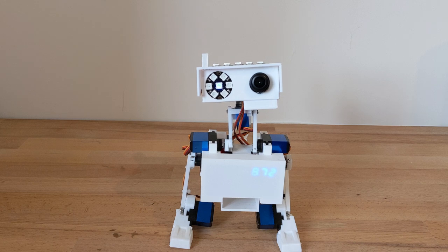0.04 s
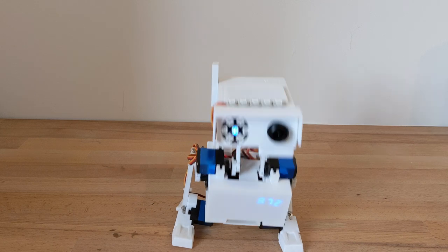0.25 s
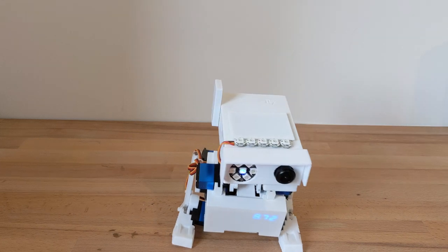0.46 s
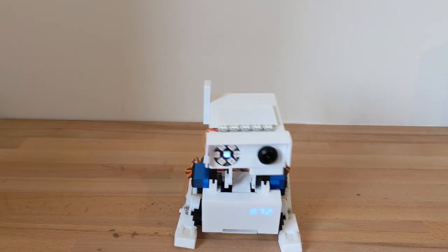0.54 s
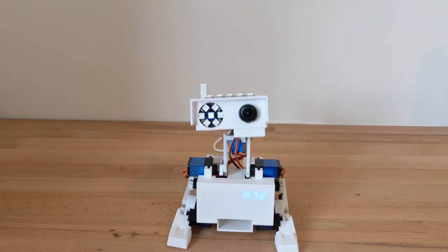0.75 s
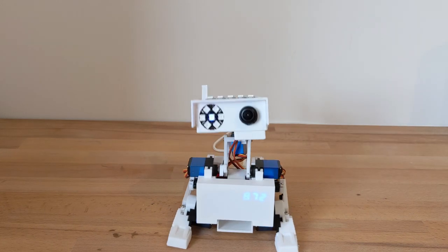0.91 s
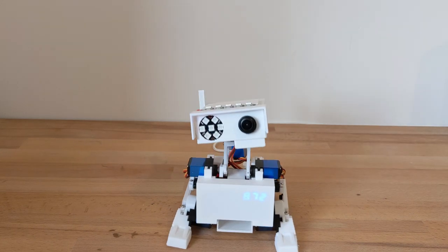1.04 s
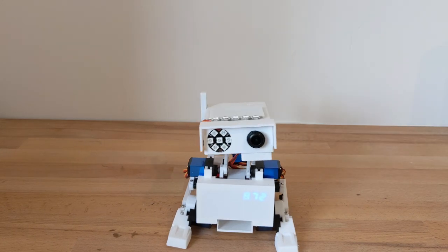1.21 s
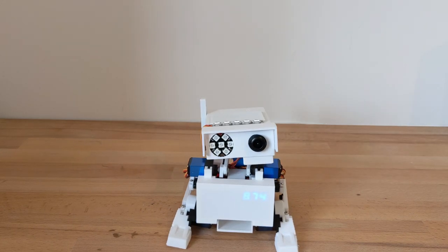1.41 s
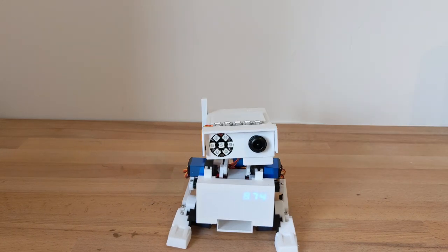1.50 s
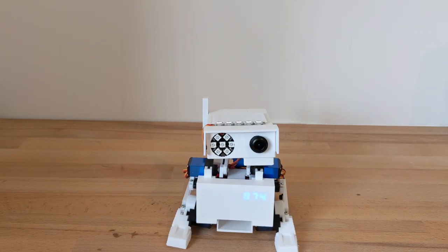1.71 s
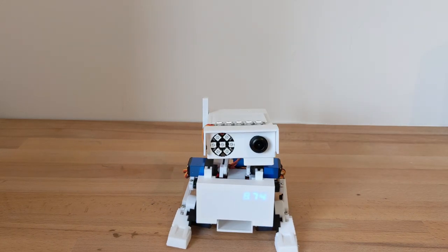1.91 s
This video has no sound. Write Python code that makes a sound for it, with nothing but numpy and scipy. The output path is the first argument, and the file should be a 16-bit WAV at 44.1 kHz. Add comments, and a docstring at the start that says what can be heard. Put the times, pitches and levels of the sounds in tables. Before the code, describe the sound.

Servo whirring from a small plastic robot, gritty and high, with faint knocks on a wooden tabletop

```python
"""A quiet room's rumble, microphone hiss and a thin electrical whistle come first, as shaped noise.
Small servos in a legged desk robot then whir in short surges: random tooth ticks ring plastic cases.
Its parts knock on a wooden table top, which booms and hums as sums of decaying modes; soft thuds swell.
Late in the scene short motor whines, noise in moving narrow resonances, rise out of the gear noise."""
import sys
import numpy as np
from scipy import signal
from scipy.fft import rfft, irfft
from scipy.io import wavfile
from scipy.ndimage import uniform_filter1d

SR = 44100
rng = np.random.default_rng(int(sys.argv[2]) if len(sys.argv) > 2 else 0)


def log_audio(samples):
    """Write samples as a 16-bit WAV file to the path given in sys.argv[1]."""
    # one column per channel
    frames = np.atleast_2d(samples).T
    # limit to full scale, then quantise
    limited = np.clip(frames, -1, 1)
    pcm = np.round(limited * 32767).astype(np.int16)
    wavfile.write(sys.argv[1], SR, pcm)


N = 85995  # length in samples

# Spectrum of rumble and hiss. Each row: frequency in Hz, relative density in dB per Hz.
FLOOR_SPECTRUM = [(24, -42), (40, 10), (263, -2), (466, -10.5), (1110, -11.5), (2340, -18), (5040, -26),
                  (11100, -34), (13300, -40)]
# Stereo balance of the noise floor. Each row: frequency in Hz, left over right in dB.
FLOOR_BALANCE = [(60, 5.5), (1000, -1), (11500, 23.5), (13000, 10)]
# Likeness of the floor in the two channels. Each row: frequency in Hz, correlation from 0 to 1.
FLOOR_LIKENESS = [(50, 0.87), (250, 0.65), (1000, 0.067)]
FLOOR_DB = -63.5
WHISTLE_HZ, WHISTLE_WIDTH_HZ, WHISTLE_DB = 15650, 69, -81

# Effort of the servos, surging with each small step. Each row: time in seconds, level in dB.
SERVO_EFFORT = [(.122, -78.5), (.138, -58.5), (.19, -53.5), (.218, -63), (.236, -44), (.256, -48),
                (.282, -38), (.316, -47.5), (.342, -36), (.366, -43.5), (.394, -37), (.415, -42),
                (.48, -37.5), (.518, -42.5), (.54, -34), (.564, -42.5), (.59, -36), (.618, -40), (.68, -40),
                (.695, -34), (.722, -41), (.738, -32), (.78, -45.5), (.862, -49.5), (.941, -70.5),
                (.947, -44), (1.01, -38.5), (1.042, -48.5), (1.048, -37), (1.096, -36), (1.146, -42),
                (1.212, -34), (1.252, -51.5), (1.272, -45), (1.291, -63), (1.293, -44), (1.298, -51.5),
                (1.322, -36), (1.372, -41), (1.414, -56.5), (1.46, -52), (1.496, -63.5), (1.514, -50),
                (1.56, -44), (1.616, -43), (1.67, -64.5), (1.75, -74)]
# Colour of the gears. Each row: time in seconds, centre of the main case resonances in Hz,
# upper resonance in dB, gear grind in dB (the last two before UPPER_DB and GRIND_DB are added).
GEAR_COLOUR = [(.12, 6600, 4, -4), (.28, 6350, -6, -9.5), (.58, 6260, -2, -6), (.68, 6230, -12, -9),
               (.78, 6350, -10, -5), (.92, 6400, -7, -6.5), (.95, 7660, -12, -16.5), (1.1, 7880, -5, -20),
               (1.22, 7420, -5.5, -14), (1.29, 7100, -7, -13.5), (1.34, 7900, -6, -17.5),
               (1.47, 6400, 4, 2.5), (1.55, 6680, -6, -3.5), (1.62, 5780, -34, -13)]
# Spectrum of the gear grind. Each row: frequency in Hz, relative gain in dB.
GRIND_SPECTRUM = [(300, -27.5), (700, -5), (1500, -13), (2500, -0.5), (4000, 3.5), (5500, 13.5), (10000, 7),
                  (15500, 0.5)]
TEETH_PER_S, TOOTH_SPREAD_DB = 3500, 11  # mean tick rate; mean excess of the random tick size
HISS_SHARE = 0.67  # friction hiss against ticks, 0 to 1
SERVOS, CASE_RING_S = 6, 0.026  # number of servos; t60 of each case's fine ring
TURN_HZ, TURN_DB = 10, 4.5  # how fast and far the servos trade places in loudness
CASE_WIDTH_HZ, CASE_SPLIT, CASE_DB = 1180, 0.17, -3  # split: greatest half spacing, share of the centre
UPPER_HZ, UPPER_WIDTH_HZ, UPPER_DB = 12600, 4220, -1
DRIFT, DRIFT_HZ = 0.054, 32  # the case resonances wander as the joints turn: rms share, top rate
GRIND_DB = 8
GEAR_BALANCE_DB = 1.14  # left over right

# Knocks on the table. Each row: start in seconds, clack in dB before CLACK_DB is added, boom in dB
# before BOOM_DB is added, hardness (bandwidth of the blow) in Hz, table overtones relative in dB.
TABLE_KNOCKS = [(.365, -23.5, -47.5, 4080, 5.5), (0.456, -69, -50.5, 600, -2), (.551, -36, -46, 1250, 9),
                (.612, -57.5, -59.5, 510, 15.5), (0.689, -40, -56.5, 1430, 12.5),
                (0.792, -46.5, -45.5, 1090, -0.5), (0.963, -40.5, -46.5, 2470, -21),
                (.987, -43.5, -54.5, 890, 3), (1.156, -53.5, -56, 505, -14), (1.254, -55, -48.5, 507, -35),
                (1.473, -58, -54, 515, -23)]
# Deep modes of the table top. Each row: frequency in Hz, relative level in dB, t60 in seconds.
TABLE_MODES = [(66, -17, 0.44), (130.7, 1.1, 0.41)]
# Overtones of the table top. Each row: frequency in Hz, relative level in dB, t60 in seconds.
TABLE_OVERTONES = [(186.4, -13.5, 0.25), (253.5, -5.5, 0.12), (334.3, -10.5, 0.085), (444, -13, 0.11)]
# Modes of the plastic shell. Each row: frequency in Hz, relative level in dB, t60 in seconds.
SHELL_MODES = [(432, -13.5, 0.026), (676, -11, 0.035), (1225, 4, 0.0063), (1550, -18, 0.0013),
               (2210, 6.5, 0.0063), (3280, 12, 0.0017)]
BOOM_DB, CLACK_DB = 3.5, -10
BOOM_RISE_S, BOOM_HOLD_S, BOOM_STOP_S = 0.0084, 0.067, 0.016  # the robot's weight damps the table again
BOOM_TAIL_DB = -13.5  # what still rings after that
HUM_DB = -21  # table hum relative to servo effort
BLOW_DB, REBOUND_S = -17, 0.001278  # direct blow beside the shell modes; delay of the second blow
RATTLE_DB, RATTLE_S = -25, 0.12  # starting level and t60 of the loose parts

# Soft low thuds. Each row: start in seconds, length in seconds, level in dB, frequency in Hz.
LOW_THUDS = [(0.573, 0.17, -52.5, 60.3), (0.8, 0.048, -51, 58.7), (1.777, 0.07, -48.5, 66.4),
             (1.836, 0.048, -47.5, 68), (1.899, 0.072, -48.5, 62)]
# Motor whines. Each row: start in seconds, length in seconds, level in dB, top of the pitch arch
# in Hz before the wobble.
MOTOR_WHINES = [(1.05, 0.096, -57.5, 1620), (1.19, 0.03, -57, 1120), (1.265, 0.03, -56.5, 810),
                (1.31, 0.08, -60.5, 1640), (1.422, 0.055, -57.5, 840), (1.52, 0.045, -61, 1240)]
WHINE_WIDTH_HZ, WHINE_FLUTTER_DB, WHINE_WOBBLE = 150, 2.5, .025  # wobble: rms share of the pitch
WHINE_ARCH_PER_S = 3.3  # longer runs climb further

# Decay of the room. Each row: frequency in Hz, t60 in seconds.
ROOM_DECAY = [(200, 0.4), (1000, 0.62), (4000, 0.18), (12000, 0.14)]
ROOM_DB, ECHOES_DB = -6.5, -10  # late tail, early echoes
EDGE_HZ = 16000  # top of the band


def amp(db):
    """Decibel law: a level in dB as an amplitude ratio."""
    return 10 ** (np.asarray(db) / 20)


def evened(x):
    """Power normalisation: scale to an rms of 1."""
    return x / np.sqrt(np.mean(x ** 2) + 1e-20)


def read(points, hz):
    """Interpolation of a spectrum along logarithmic frequency."""
    f, value = np.transpose(points)
    return np.interp(np.log(hz + 1), np.log(f + 1), value)


def curve(rows, column):
    """Linear interpolation of one column in time."""
    rows = np.array(rows)
    return np.interp(np.arange(N) / SR, rows[:, 0], rows[:, column])


def add(mix, start_s, sound):
    """Superposition: add a sound into the mix from its start time."""
    part = mix[round(start_s * SR):][:len(sound)]
    part += sound[:len(part)]


def slow(top_hz):
    """Low-pass noise: a random fluctuation slower than top_hz, with an rms of 1."""
    sos = signal.butter(2, top_hz, fs=SR, output="sos")
    return evened(signal.sosfiltfilt(sos, rng.standard_normal(N)))


def resonate(x, hz, width_hz):
    """Heterodyne resonance of peak gain 1: shift hz to zero, smooth, shift back; hz may move."""
    turn = np.exp(2j * np.pi * np.cumsum(hz * np.ones(len(x))) / SR)
    r = np.exp(-np.pi * width_hz / SR)
    return 2 * (turn * signal.lfilter([1 - r], [1, -r], x / turn)).real


def resonate_twice(x, hz, first_width_hz, second_width_hz):
    """Cascaded resonances: two passes at one frequency steepen the skirts."""
    return resonate(resonate(x, hz, first_width_hz), hz, second_width_hz)


def ring(modes):
    """Modal synthesis: a struck object is a sum of exponentially decaying sines."""
    t = np.arange(SR // 2) / SR
    return sum(amp(db - 60 * t / t60) * np.sin(2 * np.pi * hz * t) for hz, db, t60 in modes)


def floor():
    """Partly correlated noise: shared and separate parts give room rumble and hiss their width."""
    hz = np.fft.rfftfreq(N, 1 / SR)
    first, second = rfft(rng.standard_normal((2, N)), axis=1)
    same = read(FLOOR_LIKENESS, hz)
    half_balance = read(FLOOR_BALANCE, hz) / 2
    left = first * amp(half_balance)
    right = (same * first + np.sqrt(1 - same ** 2) * second) * amp(-half_balance)
    spectrum = np.array([left, right]) * amp(read(FLOOR_SPECTRUM, hz))
    return amp(FLOOR_DB) * evened(irfft(spectrum, N, axis=1))


def whistle():
    """Narrow-band noise: a sharp resonance makes a thin electrical whistle."""
    noise = rng.standard_normal(N)
    return amp(WHISTLE_DB) * evened(resonate_twice(noise, WHISTLE_HZ, WHISTLE_WIDTH_HZ, WHISTLE_WIDTH_HZ))


def teeth():
    """Random impulse train: uneven tooth ticks mixed with broadband friction hiss."""
    excess = np.minimum(rng.exponential(1, N), 5)
    size = amp(TOOTH_SPREAD_DB * excess) * rng.choice([-1., 1.], N)
    ticks = evened(size * (rng.random(N) < TEETH_PER_S / SR))
    return (1 - HISS_SHARE) * ticks + HISS_SHARE * rng.standard_normal(N)


def joints():
    """Convolution along separate paths: servos trade loudness, each with its own dense fine ring."""
    t = np.arange(SR // 10) / SR
    out = np.zeros((2, N))
    for _ in range(SERVOS):
        ticks = teeth() * amp(TURN_DB * slow(TURN_HZ))
        paths = rng.standard_normal((2, len(t))) * amp(-60 * t / CASE_RING_S)
        out += signal.fftconvolve(ticks[None], paths, axes=1)[:, :N]
    power = uniform_filter1d((out ** 2).mean(0), size=1300)
    return out / np.sqrt(power)  # level steady, so that the effort alone sets the surges


def gears(drives):
    """Source and filter: the tooth ticks excite case resonances and a broad gear grind."""
    low, high, top = (1 + DRIFT * slow(DRIFT_HZ) for _ in range(3))
    centre = curve(GEAR_COLOUR, 1)
    split = CASE_SPLIT * (centre.min() / centre) ** 2  # the pair closes up as it rises
    grind_gain = amp(read(GRIND_SPECTRUM, np.fft.rfftfreq(N, 1 / SR)))
    out = []
    for drive in drives:
        above = resonate_twice(drive, centre * (1 + split) * high, CASE_WIDTH_HZ, 2 * CASE_WIDTH_HZ)
        below = resonate_twice(drive, centre * (1 - split) * low, CASE_WIDTH_HZ, 2 * CASE_WIDTH_HZ)
        upper = resonate_twice(drive, UPPER_HZ * top, UPPER_WIDTH_HZ, 2 * UPPER_WIDTH_HZ)
        grind = irfft(rfft(drive) * grind_gain, N)
        out.append(amp(CASE_DB) * evened(above - below)
                   + amp(UPPER_DB + curve(GEAR_COLOUR, 2)) * evened(upper)
                   + amp(GRIND_DB + curve(GEAR_COLOUR, 3)) * evened(grind))
    return amp(curve(SERVO_EFFORT, 1)) * np.array(out)


def table_hum():
    """Forced vibration: the servos' shaking, as noise, drives the table's deep modes."""
    effort = amp(curve(SERVO_EFFORT, 1))
    hum = signal.fftconvolve(rng.standard_normal(N) * effort, ring(TABLE_MODES))[:N]
    return amp(HUM_DB) * np.sqrt(np.mean(effort ** 2)) * evened(hum)


def clacks():
    """Impact excitation: plastic shell hits wood, rebounds quickly, then loose parts rattle out."""
    out = np.zeros(N)
    t = np.arange(SR // 4) / SR
    shell = ring(SHELL_MODES)[:2000] + amp(BLOW_DB) * signal.unit_impulse(2000)
    for start_s, db, _, hardness_hz, _ in TABLE_KNOCKS:
        grains = rng.standard_normal(len(t)) * amp(5.6 * rng.standard_normal(len(t)))
        push = amp(RATTLE_DB - 60 * t / RATTLE_S) * grains
        push[[0, round(REBOUND_S * SR)]] -= 1, .9  # blow and rebound
        band = signal.butter(2, [350, hardness_hz + 350], "bandpass", fs=SR)
        soft = signal.lfilter(*band, push)
        level = amp(db + CLACK_DB) * 3000 / hardness_hz  # makes up for the narrower band of soft blows
        add(out, start_s, level * signal.fftconvolve(soft, shell))
    return out


def chatter():
    """Repeated impact: table overtones struck once, then again by small uneven bounces."""
    bounces = .12 * rng.standard_normal(SR // 10) * (rng.random(SR // 10) < 400 / SR)
    strikes = signal.unit_impulse(SR // 10) + bounces
    return signal.fftconvolve(ring(TABLE_OVERTONES), strikes)[:SR // 2]


def table_boom():
    """Free vibration with added damping: each knock rings the table's modes, then weight stops them."""
    out = np.zeros(N)
    t = np.arange(SR // 2) / SR
    rise = np.minimum(t / BOOM_RISE_S, 1)
    damping = np.exp(-(np.maximum(t - BOOM_HOLD_S, 0) / BOOM_STOP_S) ** 2)
    shape = rise * (amp(BOOM_TAIL_DB) + damping)
    for start_s, _, db, _, overtones_db in TABLE_KNOCKS:
        modes = ring(TABLE_MODES) + amp(overtones_db) * chatter()
        add(out, start_s, -amp(db + BOOM_DB) * shape * modes)
    return out


def thuds():
    """Enveloped harmonics: soft low swells with a faint octave."""
    out = np.zeros(N)
    for start_s, length, db, hz in LOW_THUDS:
        t = np.arange(0, length, 1 / SR)
        tone = np.sin(2 * np.pi * hz * t) + amp(-11) * np.sin(2 * np.pi * 2 * hz * t)
        add(out, start_s, amp(db) * np.sin(np.pi * t / length) * tone)
    return out


def whines():
    """Moving narrow-band noise: short fuzzy tones whose pitch arches with motor speed."""
    out = np.zeros(N)
    for start_s, length, db, top_hz in MOTOR_WHINES:
        arch = np.sin(np.pi * np.arange(0, length, 1 / SR) / length)
        noise = (teeth() * amp(WHINE_FLUTTER_DB * slow(39)))[:len(arch)]
        pitch = top_hz * (1 - WHINE_ARCH_PER_S * length * (1 - arch))
        pitch = pitch * (1 + WHINE_WOBBLE * slow(44)[:len(arch)])
        tone = evened(resonate_twice(noise, pitch, WHINE_WIDTH_HZ, WHINE_WIDTH_HZ))
        add(out, start_s, amp(db) * np.sqrt(arch) * tone)
    return np.array([out, np.roll(out, 9)])  # 9 samples: a slightly longer path to the right


def room(x):
    """Reverberation: early echoes off table and wall, then sparse taps dying band by band."""
    taps = np.zeros((2, SR // 2))
    at = np.arange(400, SR // 2 - 20, 20) + rng.integers(0, 20, (2, (SR // 2 - 401) // 20))
    np.put_along_axis(taps, at, rng.choice([-1., 1.], at.shape), 1)
    hz, t, bands = signal.stft(taps, SR, nperseg=256)
    decay = amp(-60 * t / read(ROOM_DECAY, hz)[:, None])
    response = signal.istft(bands * decay, SR, nperseg=256)[1]
    response *= amp(ROOM_DB) / np.linalg.norm(response[0])
    early = rng.integers(10, 350, (2, 6))  # delays in samples
    echoes = amp(ECHOES_DB) / np.sqrt(6) * rng.choice([-1., 1.], early.shape)
    np.put_along_axis(response, early, echoes, 1)
    return signal.fftconvolve(x, response, axes=1)[:, :N]


def scene():
    """Superposition of sources: robot close and near the middle, table bass alike in both channels."""
    balance = amp([[GEAR_BALANCE_DB / 2], [-GEAR_BALANCE_DB / 2]])
    robot = gears(joints()) * balance + clacks()
    table = table_boom() + table_hum()
    return robot + room(robot) + whines() + table + thuds() + floor() + whistle()


def record(dry):
    """Band limiting: a linear-phase low-pass removes what lies above EDGE_HZ."""
    lowpass = signal.firwin(511, EDGE_HZ, window=("kaiser", 9), fs=SR)
    return signal.oaconvolve(dry, lowpass[None], "same")


dry = scene()
out = record(dry)
log_audio(out)
```